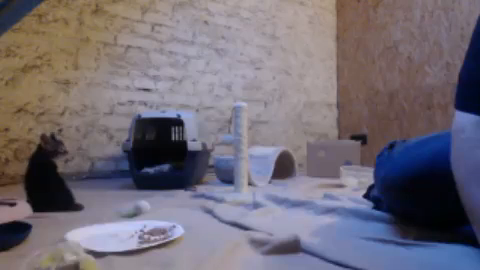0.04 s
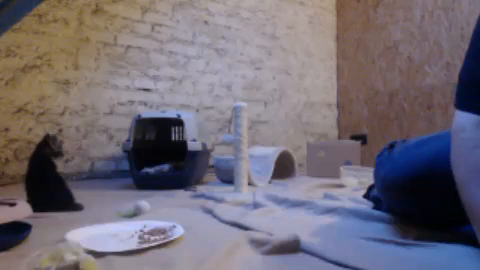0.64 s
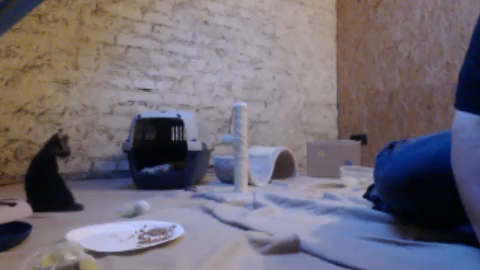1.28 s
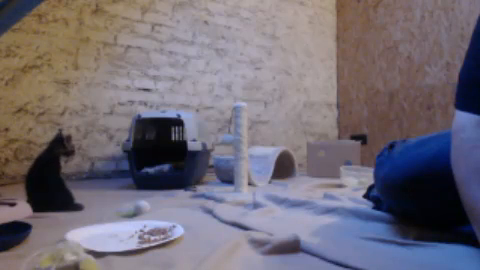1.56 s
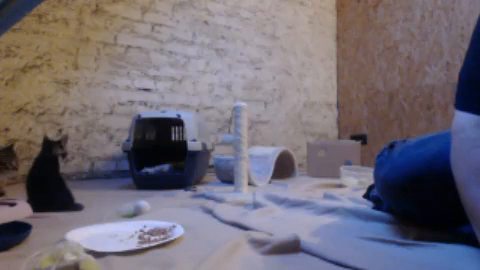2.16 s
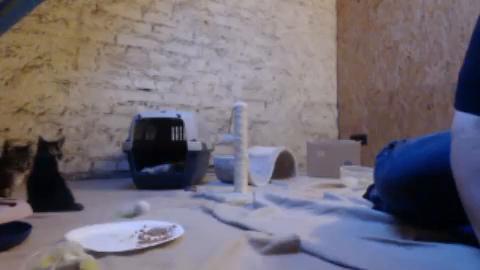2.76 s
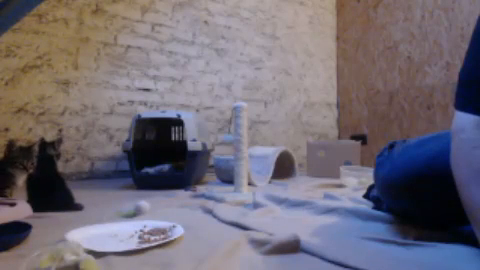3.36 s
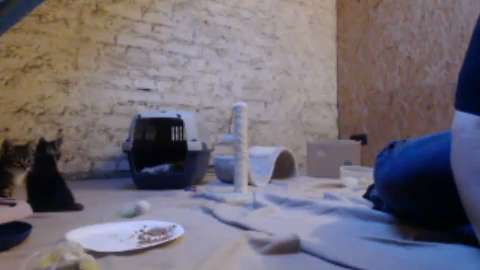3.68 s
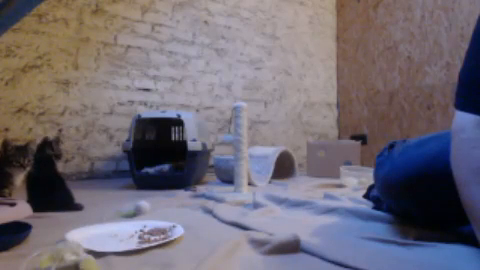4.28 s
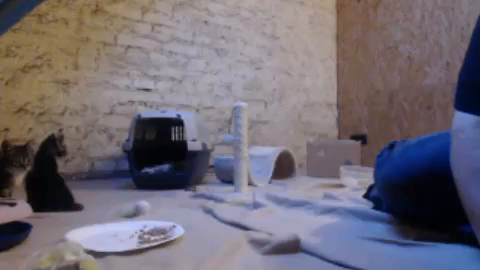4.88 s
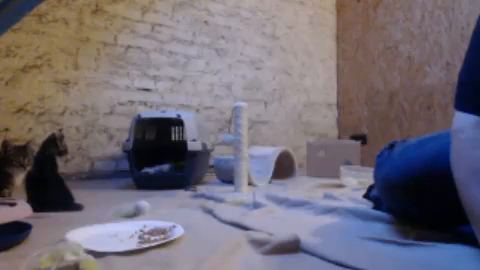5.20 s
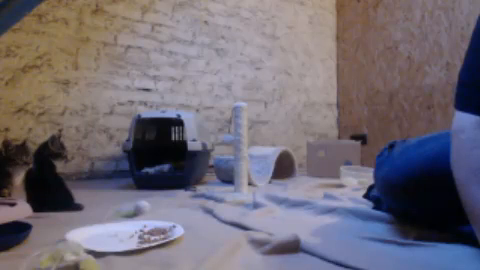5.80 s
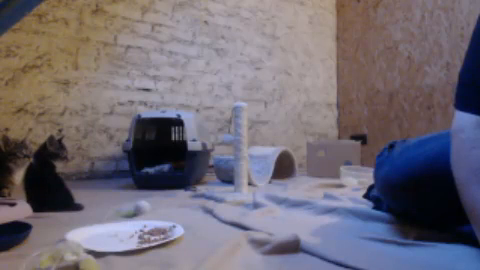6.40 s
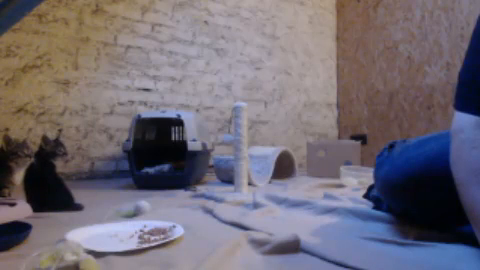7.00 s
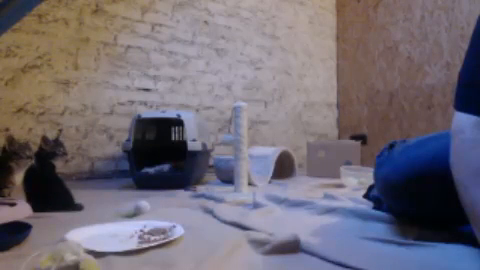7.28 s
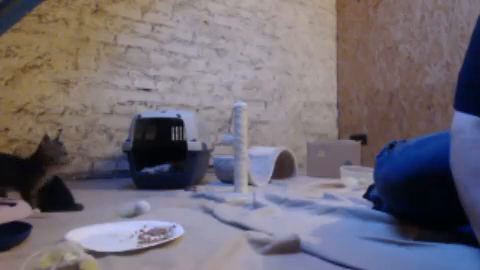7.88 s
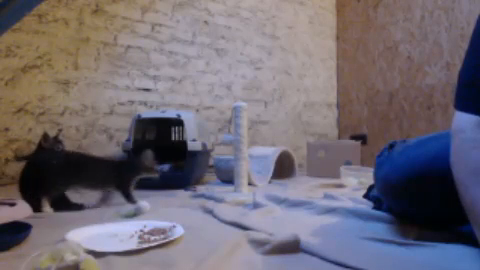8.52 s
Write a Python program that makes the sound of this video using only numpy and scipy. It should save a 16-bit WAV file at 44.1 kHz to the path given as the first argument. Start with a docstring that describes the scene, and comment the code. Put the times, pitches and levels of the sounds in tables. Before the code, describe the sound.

Kittens play softly on a blanket-covered floor in a small room. Two quick swishes of cloth and a tiny squeak come first, then faint paw scuffs and padded knocks. Toward the end a scratchy dash builds into a close, dull thump and a short sliding scrape. A small button-like double click recurs a little more than once a second throughout, above a low rumble and faint electrical hum.

```python
"""A small, quiet room with a faint electrical hum, where kittens play on a blanket-covered floor.
Something small clicks in pairs, like a button pressed and let go. Cloth is flicked in quick puffs,
and a thin squeak slips by. Paws drag the blanket, its threads catching and slipping, and soft blows
ring the floor. Near the end a kitten scrabbles across, lands with a close thump and skids."""
import sys
import numpy as np
from scipy import signal
from scipy.fft import rfft, irfft, next_fast_len
from scipy.io import wavfile

SR = 44100
rng = np.random.default_rng(int(sys.argv[2]) if len(sys.argv) > 2 else 0)


def master(y):
    """Save y as 16-bit WAV."""
    cut = np.clip(np.atleast_2d(y).T, -1, 1)
    pcm = np.round(cut * 32767)  # scale
    wavfile.write(sys.argv[1], SR, pcm.astype(np.int16))


N = 381465
TIME = np.arange(N) / SR


def gain_of(db):
    return 10 ** (np.asarray(db) / 20)


def unit_rms(x):
    return x / np.sqrt(np.mean(x ** 2) + 1e-20)


def curve_at(points, hz):
    """Reads a breakpoint curve along a log frequency axis."""
    point_hz, value = np.transpose(points)
    return np.interp(np.log(hz + 1), np.log(point_hz + 1), value)


def add(mix, start_s, sound):
    part = mix[..., round(start_s * SR):][..., :sound.shape[-1]]
    part += sound[..., :part.shape[-1]]


def coloured(pair, spectrum):
    """Shapes two unrelated signals and makes their bass alike, as two close microphones hear it."""
    # stereo image, narrow in the bass: (frequency [Hz], left-right correlation [0 to 1])
    correlation = [(60, 1), (130, 0.97), (240, 0.97), (490, 0.85), (1000, 0.64), (1400, 0.23), (2000, 0.2),
                   (8000, 0.076)]
    size = next_fast_len(pair.shape[1])
    hz = np.fft.rfftfreq(size, 1 / SR)
    a, b = rfft(pair, size)
    alike = curve_at(correlation, hz)
    mid, side = a * np.sqrt(1 + alike), b * np.sqrt(1 - alike)
    shaped = np.array([mid + side, mid - side]) * gain_of(curve_at(spectrum, hz))
    return unit_rms(irfft(shaped, size)[:, :pair.shape[1]])


def noise(spectrum, size=N):
    """Steady stereo noise of the given colour."""
    return coloured(rng.standard_normal((2, size)), spectrum)


def wander(rate_hz):
    """Random modulation with nothing faster than rate_hz."""
    slow = np.fft.rfftfreq(N, 1 / SR) < rate_hz
    return unit_rms(irfft(rfft(rng.standard_normal(N)) * slow, N))


def resonant(x, modes):
    """Adds resonant peaks: (frequency [Hz], width [Hz], gain [dB])."""
    return x + sum(gain_of(db) * signal.lfilter(*signal.iirpeak(hz, hz / width, fs=SR), x)
                   for hz, width, db in modes)


def from_right(x, lag_s=0.00016):
    """A sound from the right reaches the left microphone a little later."""
    t = np.arange(len(x)) / SR
    return np.array([np.interp(t - lag_s, t, x), x])


def walls(x, from_hz=1100, skew_s=0.0004):
    """Near surfaces comb the treble; each echo reaches left and right at slightly different times."""
    # early reflections off floor and walls: (delay [s], gain [dB])
    echoes = [(.0023, -14.5), (.0041, -14), (.0068, -10.5), (0.01, -12.5), (0.0173, -17)]
    treble = signal.sosfilt(signal.butter(2, from_hz, "high", fs=SR, output="sos"), x)
    out = x.copy()
    for delay, db in echoes:
        for side in range(2):
            add(out[side], delay + skew_s * rng.uniform(-0.92, 1), gain_of(db) * treble[side])
    return out


def room(x, wet_db):
    """Adds a diffuse tail, each band dying at its own speed; the small room holds little deep bass."""
    # reverb time: (frequency [Hz], t60 [s])
    decay = [(100, 0.44), (500, 0.34), (2000, 0.3), (8000, 0.18)]
    wash = noise([(100, -8), (350, -0.5), (700, -1), (8000, 0.5)], size=SR // 2)
    hz, t, bands = signal.stft(wash, SR, nperseg=256)
    fade = gain_of(-60 * t / curve_at(decay, hz)[:, None]) * (t > 0)
    tail = signal.istft(bands * fade, SR, nperseg=256)[1]
    tail /= np.linalg.norm(tail[0])
    return x + gain_of(wet_db) * signal.fftconvolve(x.mean(0)[None], tail, axes=1)[:, :N]


def room_tone(rumble_db=-52.5, air_db=-64, fizz_db=-76, waver_db=-1.1, drift_cycles=0.14):
    """Building rumble, soft hiss, a thin fizz from the right and two wavering lines of hum."""
    # electrical hum: (frequency [Hz], level [dB])
    hum_lines = [(199.2, -69.5), (842.3, -68.5)]
    # colours of the building's rumble and the room's hiss: (frequency [Hz], relative level [dB])
    rumble_eq = [(15, 0.5), (38, -6.5), (46, 3.5), (56, 11), (68, 5.5), (80, 3), (102, -2), (118, -11.5),
                 (133, -5.5), (150, -19.5), (170, -14), (230, -9.5), (300, -57.5)]
    air_eq = [(150, -47), (250, -5), (326, -5.5), (362, -7.5), (501, -6.5), (674, -13), (793, -8.5),
              (854, -15), (893, -11), (1390, -15.5), (1790, -21.5), (8110, -44), (8600, -57), (11200, -86),
              (18900, -120)]
    fizz_eq = [(700, -16), (1700, 4), (2300, -2.5), (3000, -11), (5500, -23.5), (8500, -38.5)]
    hum = np.zeros(N)
    for hz, db in hum_lines:
        amplitude = gain_of(db + waver_db * wander(2.9)) * np.sqrt(2)
        hum += amplitude * np.sin(2 * np.pi * (hz * TIME + drift_cycles * wander(3.5)))
    fizz = gain_of(fizz_db) * from_right(noise(fizz_eq)[0], lag_s=0.00023)
    return gain_of(rumble_db) * noise(rumble_eq) + gain_of(air_db) * noise(air_eq) + fizz + hum


def button_clicks(rise_s=0.00043, t60_s=0.018, seat_s=0.0052, seat_db=-7, level_db=6, release_db=0.5):
    """A small spring snaps over, rings briefly and seats with a weaker tick, a little to the right."""
    # one click going down, one coming up: (time [s], held for [s], relative level [dB])
    presses = [(0.0562, 0.09, -52), (0.7769, 0.079, -54), (1.5272, 0.11, -52.5), (2.3864, 0.1, -52),
               (3.0804, .1066, -53), (3.7191, 0.094, -51.5), (4.5233, .0963, -51), (5.2888, 0.11, -51.5),
               (6.141, 0.11, -53), (7.0278, 0.11, -50.5)]
    # colour of the snap: (frequency [Hz], relative level [dB])
    snap_eq = [(200, -16), (600, 8), (1300, 1), (2300, 3), (3900, 1), (4600, -12.5), (5600, -9),
               (7000, -13), (8500, -18.5)]
    spring_mode = [(5590, 260, 5)]
    out, t = np.zeros((2, N)), np.arange(2048) / SR
    for pressed, held, press_db in presses:
        for start, db in (pressed, press_db), (pressed + held, press_db + release_db):
            envelope = (1 - np.exp(-t / rise_s)) * gain_of(db + level_db - 60 * t / t60_s)
            snap = noise(snap_eq, size=len(t))[0] * envelope
            tick = from_right(resonant(snap, spring_mode))
            add(out, start, tick)
            add(out, start + seat_s * rng.uniform(0.76, 1.3), gain_of(seat_db) * tick)
    return room(out * gain_of([[-1], [1]]), wet_db=-7)


def cloth_flicks(split_hz=1800, t60_s=0.21, treble_life=0.46, push_hz=19, push_t60_s=0.42, level_db=-3):
    """Cloth puffs with a knock and a scrape; its treble dies first, and it shoves a slow wave of air."""
    # flicks against the floor: (time [s], relative level [dB], treble against body [dB], swell [s],
    # air push against body [dB], knock [Hz], scrape [Hz], scrape gain [dB])
    flicks = [(.212, -40.5, -4.5, .028, 1, 733, 3330, 12), (.843, -31.5, 2, 0.031, 7.5, 763, 2040, -3),
              (1.785, -61.5, 10.5, 0.025, 25, 500, 1970, 10), (2.138, -56, 7.5, 0.0086, -1, 418, 1390, 5),
              (3.025, -54, -1, 0.014, -3, 390, 1310, -18), (3.556, -46, 1, 0.013, -3, 840, 1320, 6.5),
              (6.804, -50.5, 6, 0.015, -9, 226, 1000, 10.5), (7.402, -45.5, 1, 0.012, -5, 685, 1300, 0),
              (7.945, -31.5, 2, 0.019, -6, 640, 1870, 8.5)]
    # colour of the puff: (frequency [Hz], relative level [dB])
    puff_eq = [(60, -34.5), (130, -30.5), (200, 3.5), (350, -6.5), (500, 1), (760, -0.5), (1100, -6.5),
               (1600, -14), (2200, -16.5), (3000, -24), (5000, -27), (7000, -39), (8500, -50.5)]
    out, t = np.zeros((2, N)), np.arange(SR // 2) / SR
    for start, db, treble_db, swell, push_db, knock_hz, scrape_hz, scrape_db in flicks:
        peaks = [(knock_hz, 90, -2), (scrape_hz, 350, scrape_db)]
        puff = unit_rms(resonant(noise(puff_eq, size=len(t)), peaks))
        body = signal.sosfiltfilt(signal.butter(2, split_hz, fs=SR, output="sos"), puff)
        attack = np.sin(np.pi / 2 * np.minimum(t / swell, 1)) ** 2
        decay_time = np.maximum(t - 1.85 * swell, 0)  # a short hold after the swell
        fall_db = -60 * decay_time / t60_s
        treble = (puff - body) * gain_of(treble_db + fall_db / treble_life)
        push = gain_of(push_db - 60 * decay_time / push_t60_s) * np.sin(2 * np.pi * push_hz * t)
        add(out, start, gain_of(db + level_db) * attack * (body * gain_of(fall_db) + treble + push))
    return room(walls(out), wet_db=-1.5)


def friction_glide(points, spread_hz, wet_db):
    """A narrow, unsteady band of friction noise that slides in pitch."""
    times, hz, db = np.transpose(points)
    phase = 2 * np.pi * np.cumsum(np.interp(TIME, times, hz)) / SR
    envelope = np.interp(TIME, times, gain_of(db), left=0, right=0)
    band = np.sin(phase) * wander(spread_hz) * envelope
    return room(np.tile(band, (2, 1)), wet_db)


def squeak():
    """A faint, thin friction squeak that sags in pitch."""
    # path of the squeak: (time [s], pitch [Hz], level [dB])
    path = [(.42, 2200, -88), (.44, 2190, -74.5), (.485, 2110, -77), (.52, 1894, -67), (.55, 1900, -89)]
    return friction_glide(path, spread_hz=100, wet_db=5)


def fibres(spectrum, per_s, spread_db=2):
    """Threads catch and slip: a dense train of tiny snaps of uneven size."""
    accents_db = spread_db * np.minimum(rng.exponential(1, (2, N)), 4)
    snaps = gain_of(accents_db) * rng.standard_normal((2, N))
    slipping = rng.random((2, N)) < per_s / SR
    return coloured(snaps * slipping, spectrum)


def pull_envelopes(points, extra_weight_db=0, full_pull_db=-39, weight_slope=0.57, rub_slope=0.69):
    """One pull drives scratch, rumble and rub; the scratch grows fastest, so hard pulls are brighter."""
    times, db = np.transpose(points)
    t = np.arange(times[0], times[-1], 1 / SR)
    pull_db = np.interp(t, times, db) - full_pull_db
    levels_db = np.array([pull_db, weight_slope * pull_db + extra_weight_db, rub_slope * pull_db])
    return times[0], gain_of(full_pull_db + levels_db) * signal.windows.tukey(len(t), 0.02)


def paw_drags(scratch_db=1, weight_db=3.5, rub_db=-1, peak_share=0.18, edge_db=-10.5):
    """Paws pull the blanket: the weave scratches, the floor under it rumbles, the cloth rubs."""
    # colours of scratch, floor rumble and rub: (frequency [Hz], relative level [dB])
    weave_eq = [(880, -20), (1500, -12.5), (1800, -6.5), (2200, -12.5), (2520, -3.5), (3700, -5.5),
                (4000, -6), (5250, -6), (6150, -9), (8600, -24.5), (11200, -65), (18900, -120)]
    underlay_eq = [(25, 5), (60, 0.5), (110, 7), (155, -8.5), (235, 5.5), (295, -3), (360, 0.5), (480, -3),
                   (700, -16), (1500, -60.5)]
    cloth_eq = [(250, -18.5), (480, -14.5), (700, -1.5), (1000, -4), (1400, -8), (1900, -11.5), (2300, -13),
                (5000, -47)]
    # resonances in the scratch and under the blanket: (frequency [Hz], width [Hz], gain [dB])
    rasp = [(2010, 40, -4), (2570, 71, -2.5), (2805, 70, -5), (3220, 70, 2), (3630, 108, 2.5)]
    hollow = [(220.3, 7.6, 7.5), (361, 20, -5), (440, 12, -2.5), (910, 14, 14.5)]
    # small paw shuffles: (time [s], length [s], peak pull [dB], extra weight on the floor [dB])
    shuffles = [(1.767, 0.18, -74.5, -4), (1.886, 0.45, -76.5, 0.5), (2.35, 0.13, -80, 4.5),
                (2.738, 0.4, -80.5, 1), (3.015, 0.21, -81, 11.5), (3.333, .16, -70, -25),
                (3.582, 0.11, -69.5, 2), (5.858, 0.23, -81.5, 0), (6.726, 0.31, -94.5, 12)]
    # the dash across the blanket and the skid on landing: (time [s], pull [dB])
    dash = [(7.06, -78), (7.144, -68), (7.36, -69.5), (7.434, -58), (7.49, -60), (7.564, -45.5),
            (7.976, -39.5), (8.082, -73), (8.13, -68.5), (8.33, -76)]
    skid = [(8.33, -78), (8.346, -69), (8.478, -56.5), (8.532, -66), (8.65, -64.5)]
    scratch = gain_of(scratch_db) * unit_rms(resonant(fibres(weave_eq, per_s=9000), rasp))
    rumble = gain_of(weight_db) * unit_rms(resonant(fibres(underlay_eq, per_s=5200), hollow))
    rub = gain_of(rub_db) * fibres(cloth_eq, per_s=4000)
    envelopes = np.zeros((3, N))
    for start, length, db, extra_weight_db in shuffles:
        arch = [(start, db + edge_db), (start + peak_share * length, db), (start + length, db + edge_db)]
        add(envelopes, *pull_envelopes(arch, extra_weight_db))
    add(envelopes, *pull_envelopes(dash))
    add(envelopes, *pull_envelopes(skid, extra_weight_db=2))
    layers = np.array([scratch, rumble, rub]) * envelopes[:, None]
    return room(walls(layers.sum(0)), wet_db=-8.5)


def floor_thumps(low_cut_hz=60):
    """Padded blows press on the floor for a few milliseconds and ring its low modes."""
    # soft blows: (time [s], strength [dB], contact [s])
    blows = [(1.826, -29.5, 0.012), (2.006, -49, 0.0015), (2.108, -35.5, 0.012), (2.188, -40.5, .0058),
             (2.44, -45.5, 0.0055), (3.04, -38, 0.0055), (3.604, -50, 0.002), (6.822, -40, 0.0007),
             (7.128, -42.5, 0.0036), (7.619, -42, 0.00099), (7.756, -41, 0.00097), (8.374, -36, 0.0047),
             (8.389, -18.5, 0.0038), (8.408, -22.5, 0.0042), (8.429, -14.5, 0.0045), (8.456, -26.5, 0.0023)]
    # floor modes: (frequency [Hz], gain [dB], t60 [s])
    boards = [(66.2, -7.5, 0.88), (101.5, -4, 0.15), (127.5, 1, 0.11), (166.7, -8, 0.13), (200, -8.5, 0.12),
              (233.6, -9.5, 0.17), (257, -2.5, 0.14), (368, -19.5, 0.25)]
    force, t = np.zeros(N), np.arange(SR // 2) / SR
    for start, db, contact in blows:
        press = np.sin(np.pi * np.minimum(t / contact, 1)) ** 2
        add(force, start, gain_of(db) * press / press.sum())
    ring = -sum(gain_of(db - 60 * t / t60) * np.sin(2 * np.pi * hz * t) for hz, db, t60 in boards)
    radiated = signal.sosfilt(signal.butter(2, low_cut_hz, "high", fs=SR, output="sos"), ring)
    thumps = signal.fftconvolve(force, radiated)[:N]
    return room(np.tile(thumps, (2, 1)), wet_db=-4)


def skid_swish():
    """A scrape that rises in pitch through the skid."""
    # path of the scrape: (time [s], pitch [Hz], level [dB])
    path = [(8.42, 800, -44.5), (8.46, 880, -52.5), (8.58, 1086, -50), (8.65, 1320, -54)]
    return friction_glide(path, spread_hz=230, wet_db=-4)


def scene():
    """The play and the clicks over a bed of room tone."""
    slides = squeak() + skid_swish()
    return room_tone() + cloth_flicks() + slides + paw_drags() + floor_thumps() + button_clicks()


def record(dry):
    """The right microphone is slightly hotter, and a steep low-pass takes off the top."""
    low_pass = signal.firwin(801, cutoff=8650, window=("kaiser", 9), fs=SR)
    return signal.oaconvolve(dry * gain_of([[-0.45], [0.45]]), low_pass[None], "same")


dry = scene()
out = record(dry)
master(out)
```